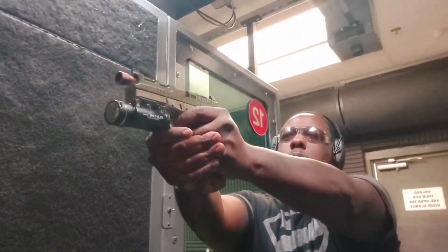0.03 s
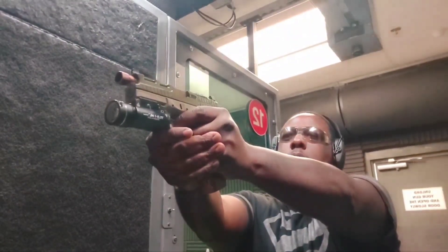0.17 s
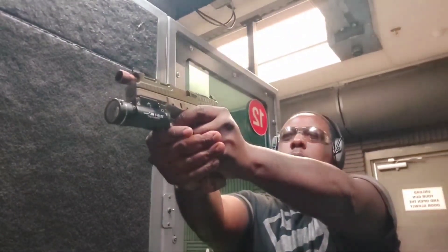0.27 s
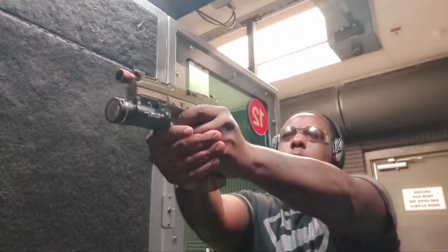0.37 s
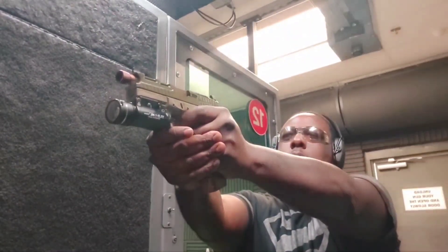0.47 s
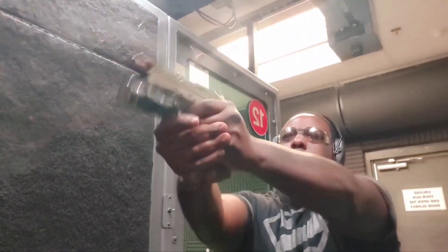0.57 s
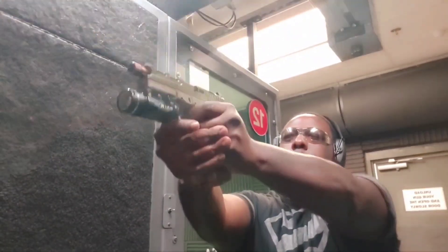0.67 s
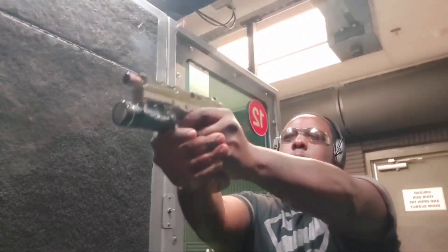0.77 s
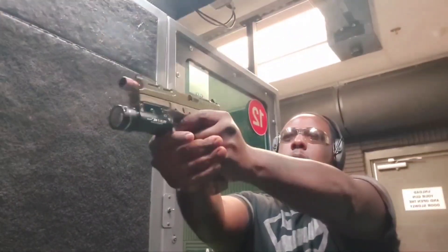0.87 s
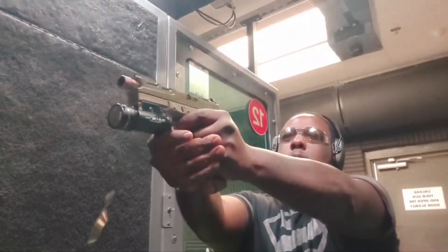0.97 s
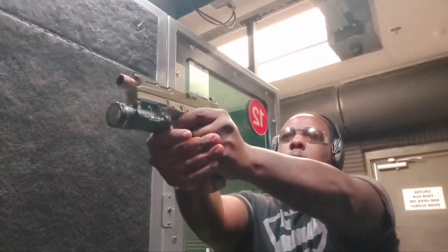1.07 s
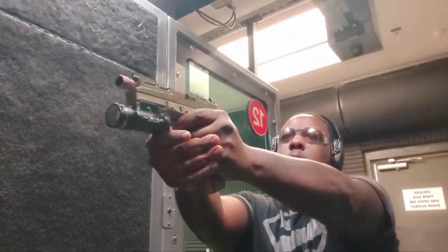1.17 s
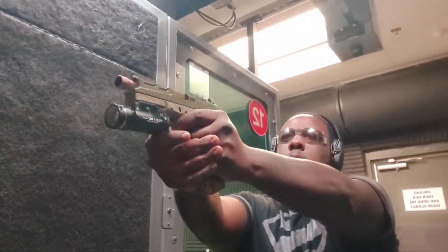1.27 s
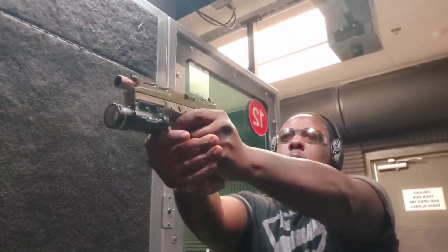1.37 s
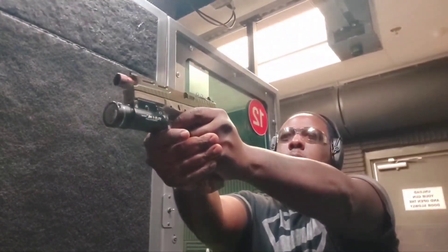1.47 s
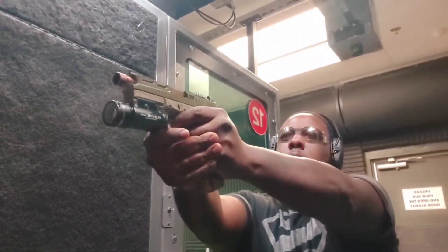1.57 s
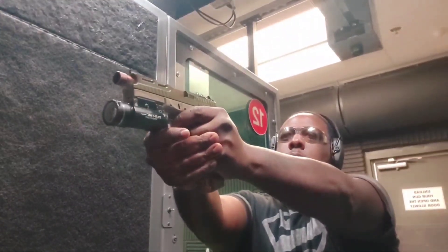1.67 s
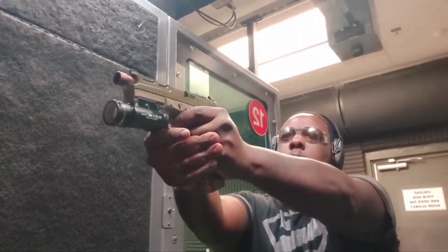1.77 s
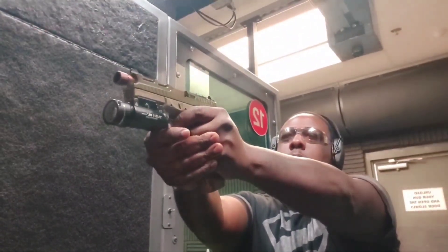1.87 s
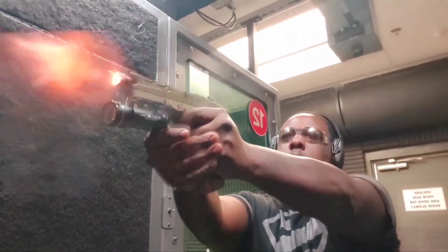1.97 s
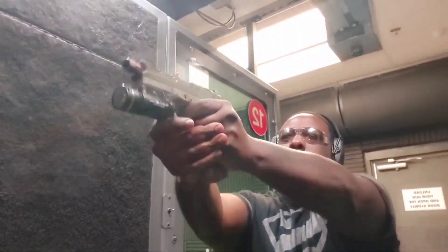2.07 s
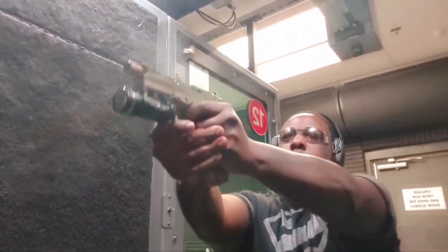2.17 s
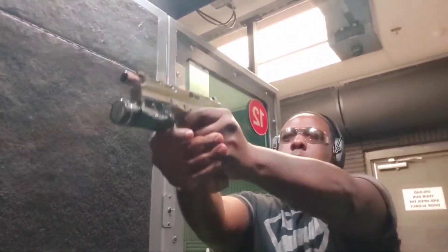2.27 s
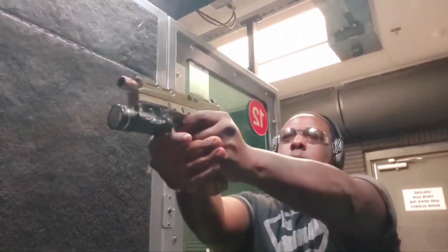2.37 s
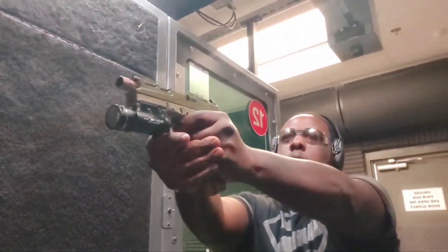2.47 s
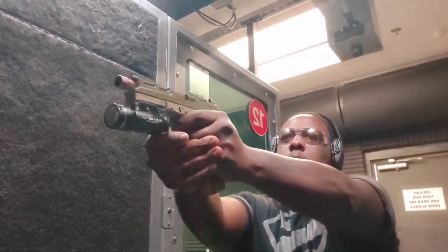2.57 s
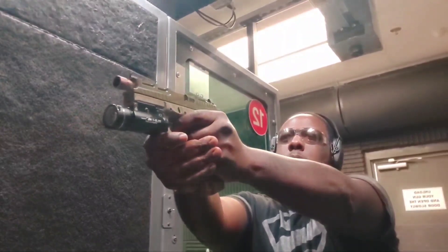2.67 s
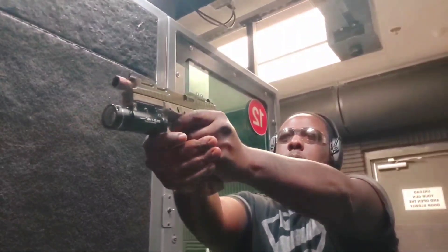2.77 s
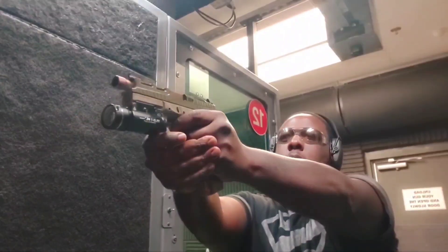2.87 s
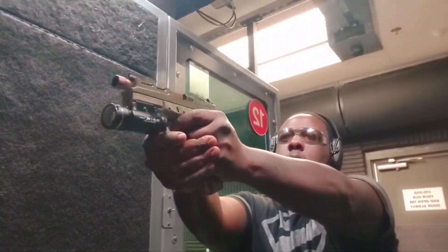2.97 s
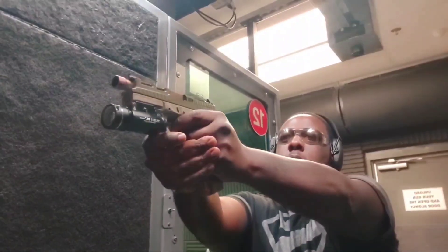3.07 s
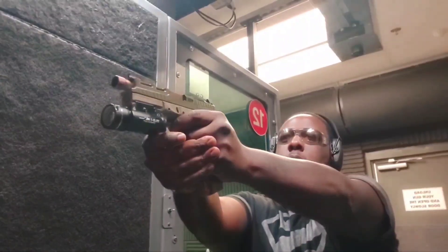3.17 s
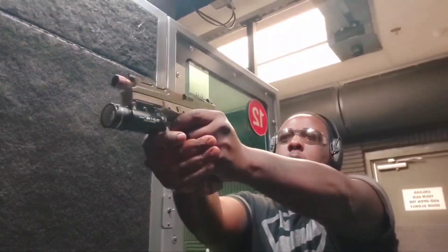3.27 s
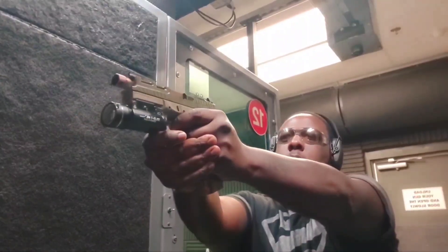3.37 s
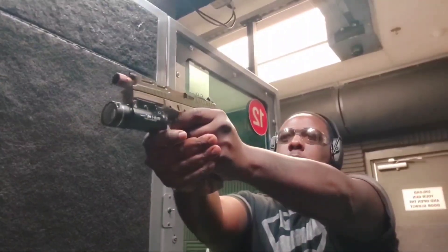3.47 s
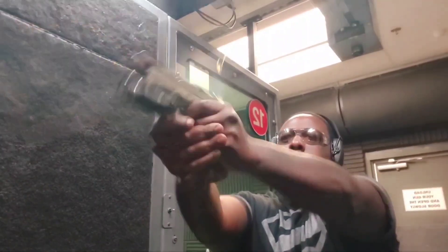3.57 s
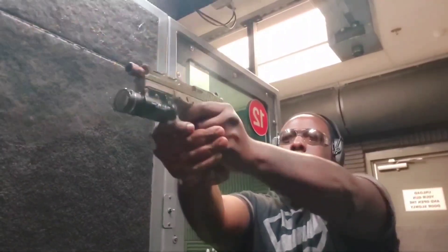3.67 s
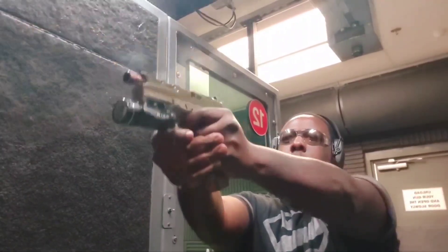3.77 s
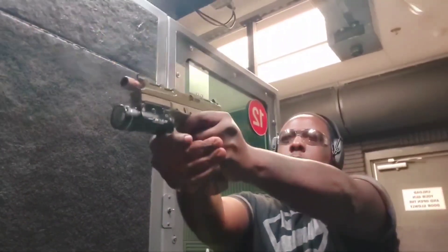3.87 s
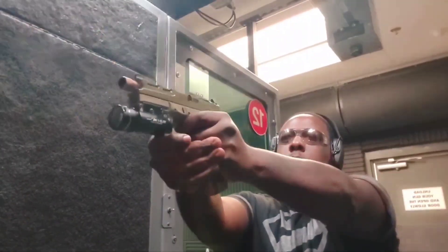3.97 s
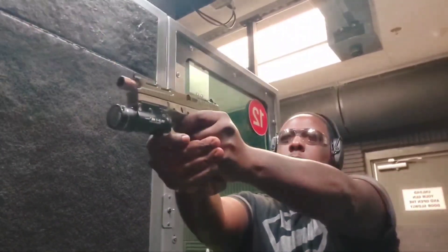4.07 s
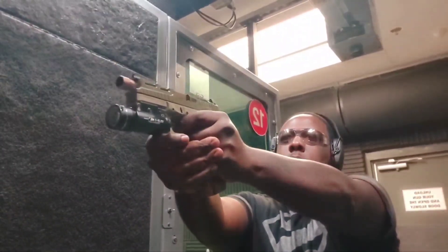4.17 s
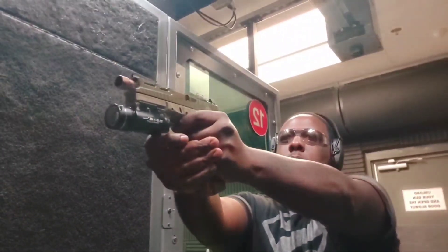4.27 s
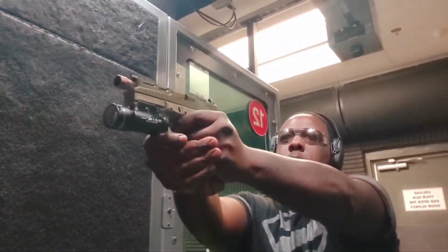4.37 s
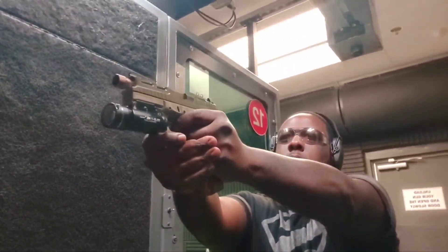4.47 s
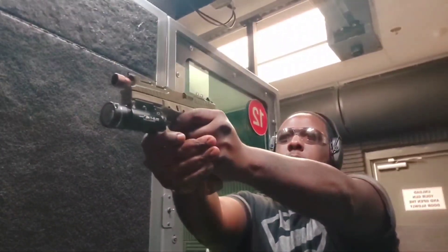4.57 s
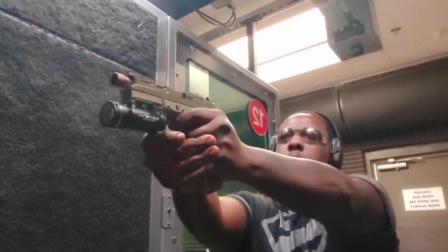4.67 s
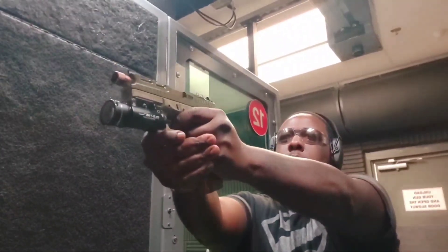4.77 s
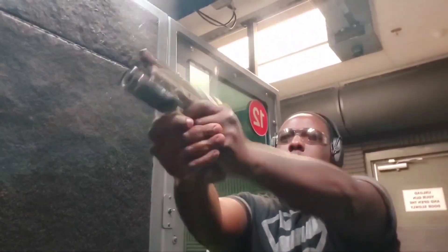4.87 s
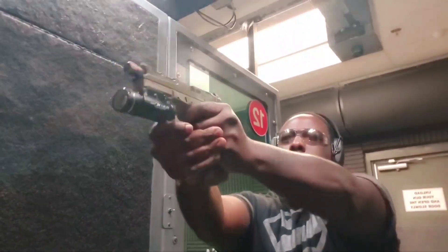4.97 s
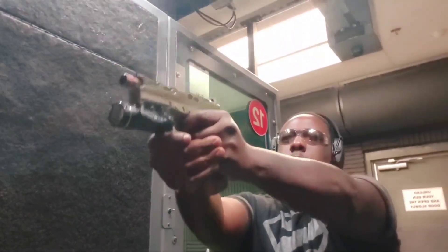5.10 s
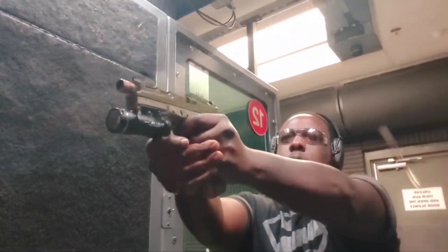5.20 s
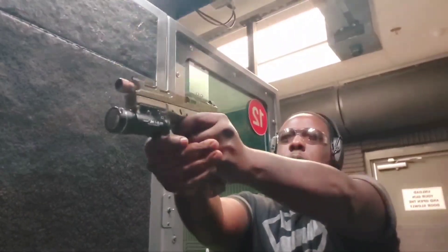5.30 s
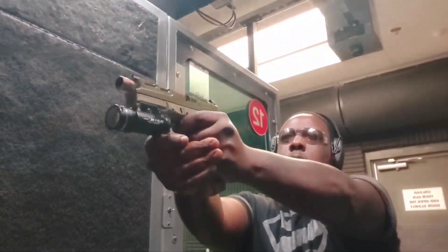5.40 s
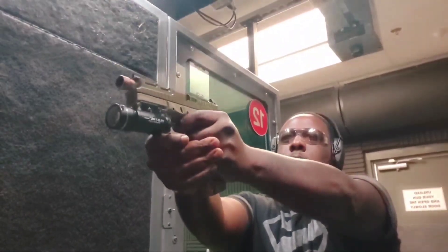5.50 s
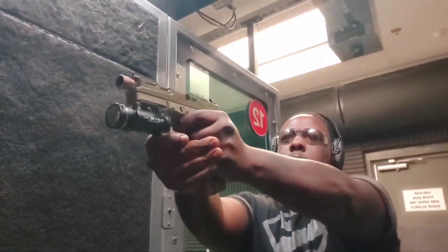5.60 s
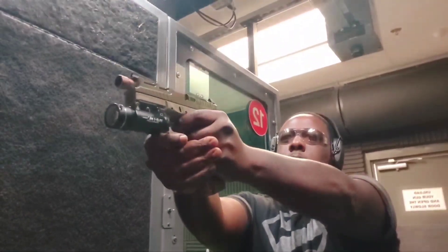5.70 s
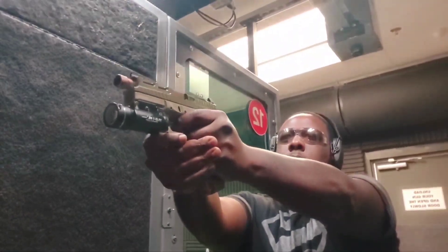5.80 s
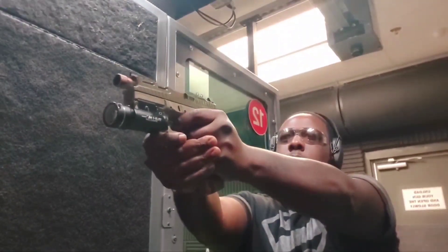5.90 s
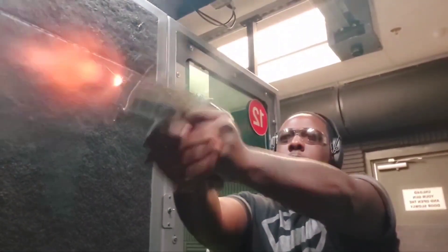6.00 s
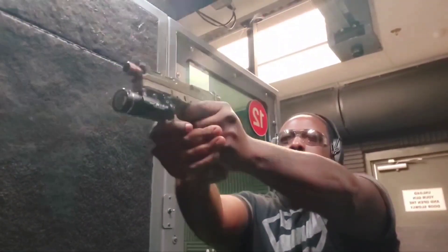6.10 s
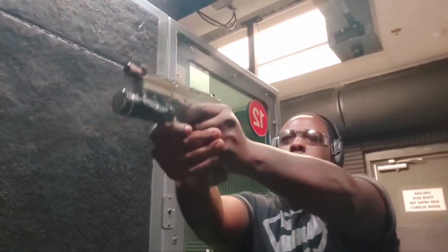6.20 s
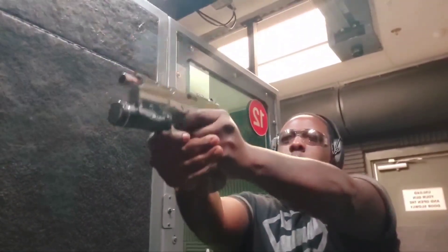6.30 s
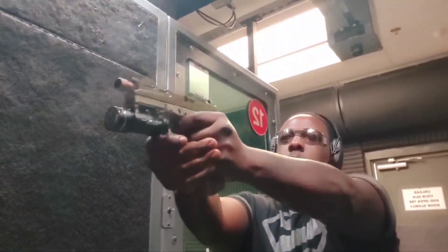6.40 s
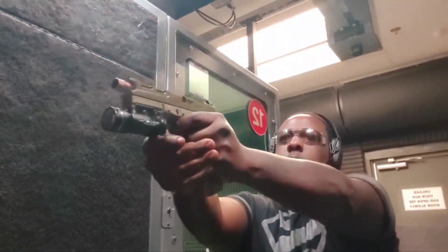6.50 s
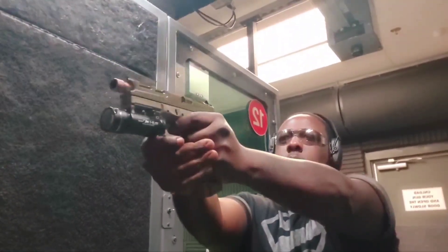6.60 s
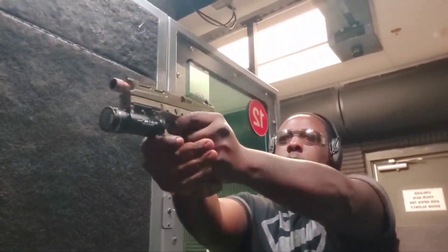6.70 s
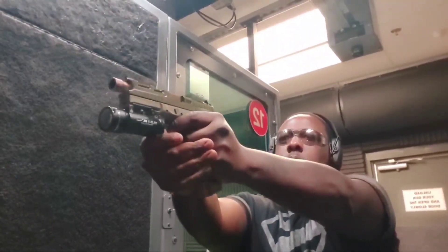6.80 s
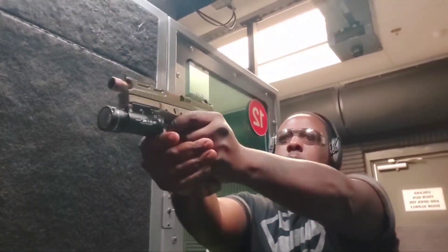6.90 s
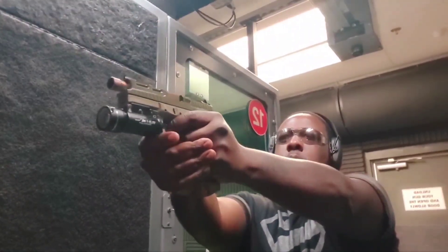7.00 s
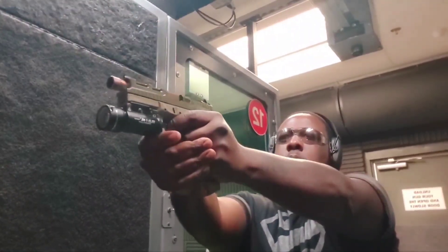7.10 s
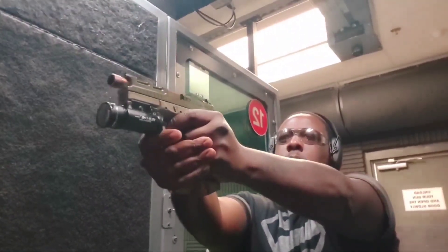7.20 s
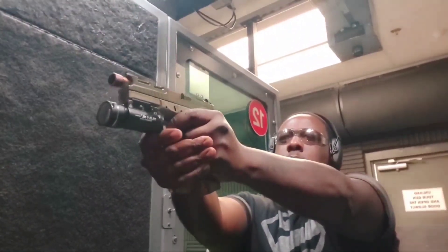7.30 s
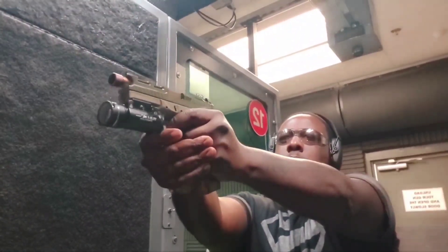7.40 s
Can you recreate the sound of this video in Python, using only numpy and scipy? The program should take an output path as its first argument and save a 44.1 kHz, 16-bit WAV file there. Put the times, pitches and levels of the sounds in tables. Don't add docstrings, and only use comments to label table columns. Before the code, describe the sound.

In a hard concrete indoor range, a handgun fires five single shots a little over a second apart. Each sharp crack slaps off the booth walls, rings briefly and blooms into echoes. Small brass cases tick and tinkle on the floor between blasts, over a low duct roar and fan drone. A close phone microphone clips and crackles.

```python
import sys
import numpy as np
from scipy import signal
from scipy.fft import rfft, irfft
from scipy.io import wavfile
from scipy.ndimage import uniform_filter1d

SR = 44100
rng = np.random.default_rng(int(sys.argv[2]) if len(sys.argv) > 2 else 0)


def voltage_ratio(level):
    return 10 ** (np.asarray(level, float) / 20)


def wrap_up_sound(samples):
    columns = np.atleast_2d(samples).T
    tamed = np.clip(columns, -1, 1)
    steps = np.round(tamed * 32767).astype(np.int16)
    wavfile.write(sys.argv[1], SR, steps)


N = 328545

# (time [s], blast level [dB])
SHOTS = [
    (0.6227, 2.5),
    (2.0943, 2),
    (3.6261, 2),
    (4.9425, 2.5),
    (6.1097, 2),
]
# (frequency [Hz], lead [rad])
LEFT_LEAD = [(50, 0.057), (130, 0.82), (250, 1.3), (450, 2.4), (900, 0.19), (2000, 0.23)]


def evened(x):
    return x / np.sqrt(np.mean(x ** 2) + 1e-20)


def read(points, hz, axis=1):
    table = np.transpose(points)
    return np.interp(np.log(hz + 1), np.log(table[0] + 1), table[axis])


def add(mix, s, sound):
    part = mix[..., round(s * SR):][..., :sound.shape[-1]]
    part += sound[..., :part.shape[-1]]


def colour(x, points):
    log_gain = np.log(voltage_ratio(read(points, abs(np.fft.fftfreq(8192, 1 / SR)))))
    taps = np.fft.ifft(np.exp(np.conj(signal.hilbert(log_gain)))).real[:4096]
    front_loaded = abs(taps[:64]).sum() > abs(taps[-64:]).sum()
    taps = taps if front_loaded else taps[::-1]
    return signal.oaconvolve(x, taps)[:len(x)]


def diffuse(points, size):
    # (frequency [Hz], likeness [0-1])
    likeness = [(60, 0.16), (130, 0.93), (290, 0.64), (640, 0.7), (1400, 0.04), (3000, 0.07), (8000, .02)]
    hz = np.fft.rfftfreq(size, 1 / SR)
    own, right = rfft(rng.standard_normal((2, size)))
    same = np.clip(read(likeness, hz), 0, 1)
    left = (same * right + np.sqrt(1 - same ** 2) * own) * np.exp(1j * read(LEFT_LEAD, hz))
    return hz, np.array([left, right]) * voltage_ratio(read(points, hz))


def resonate(x, hz, width_hz):
    turn = np.exp(2j * np.pi * hz * np.arange(len(x)) / SR)
    r = np.exp(-np.pi * width_hz / SR)
    return 2 * (turn * signal.lfilter([1 - r], [1, -r], x / turn)).real


def fan(hz):
    waver_hz = 2.2 * evened(uniform_filter1d(rng.standard_normal(N), size=SR // 8))
    phase = 2 * np.pi * np.cumsum(hz + waver_hz) / SR
    return np.sqrt(2) * np.sin(phase + [[read(LEFT_LEAD, hz)], [0]])


def ventilation():
    # (frequency [Hz], level [dB per Hz])
    duct = [(25, -103), (60, -86.5), (130, -90), (250, -89.5), (400, -83), (520, -86.5), (800, -92.5),
            (1200, -90.5), (2200, -101), (4000, -104), (6000, -108), (8600, -115), (10000, -127),
            (16000, -130)]
    # (frequency [Hz], level [dB])
    blades = [(129.2, -74.5), (285.3, -77), (389.5, -63.5), (430, -72), (456, -71), (1126, -76)]
    roar = irfft(diffuse(duct, N)[1], N)
    swell = evened(uniform_filter1d(uniform_filter1d(rng.standard_normal(N), 6000), 6000))
    roar *= voltage_ratio(-58 + 0.8 * swell) / roar[1].std()
    return roar + sum(voltage_ratio(db) * fan(hz) for hz, db in blades)


def bounce(bright_db, tick_db, body_db, ring_db):
    # (frequency [Hz], level [dB])
    knock_colour = [(1000, -27), (2500, -13), (4000, -8), (6500, -5.5), (8000, 4), (9500, -6.5), (11000, 2),
                    (14000, -1.5), (16500, -13.5)]
    t = np.arange(SR * 2 // 5) / SR
    knocks, thud, shimmer, grit = rng.standard_normal((4, len(t)))
    chatter = voltage_ratio(3.0 * evened(uniform_filter1d(grit, 130)))
    decay = voltage_ratio(-60 * t / 0.09) + voltage_ratio(-17.5 - 60 * t / 0.34)
    shape = (1 - np.exp(-t / 0.00069)) * decay * chatter
    bright = evened(colour(knocks, knock_colour)) * voltage_ratio(bright_db + 4.5) * shape
    tick = evened(np.diff(grit, prepend=0)) * voltage_ratio(tick_db + 6 - 60 * t / 0.005)
    body = voltage_ratio(body_db + 7.5) * evened(resonate(resonate(thud, 5330, 1100), 5330, 1100)) * shape
    mouth = np.sin(2 * np.pi * 10170 * t) + 0.34 * np.sin(2 * np.pi * 10215 * t)
    mouth += 0.44 * evened(resonate(resonate(shimmer, 10230, 90), 10230, 200))
    ring = voltage_ratio(ring_db - 0.5 - 60 * t / 0.32) * mouth
    return bright + tick + body + ring * (1 - np.exp(-t / 0.001))


def cases():
    # (time [s], bright scatter [dB], then against it: tick [dB],
    # body [dB], mouth ring [dB])
    landings = [(0.2415, -60, 9, -5.5, 1), (0.585, -68, -3, -10, -15), (0.989, -70, 13, -18, -3),
                (1.496, -56, -3, 4, 2), (1.9852, -56.5, 5, 4, -1.5), (2.394, -55, 14, 2, -20),
                (2.9877, -58, 9, -25, -4), (3.553, -55.5, -3, -8, 7.5), (4.118, -56, 21, -1, -20),
                (4.474, -60, 4, 2.5, 10.5), (4.7566, -70, -3, 3.5, 10), (5.406, -55.5, 21, -2, -17),
                (5.727, -51.5, 0, -0.5, -7.5), (6.479, -55.5, 18, 2, -15), (7.0256, -47.5, 3, -4, -15)]
    # (time [s], mouth ring [dB])
    tumbles = [(1.0934, -59), (1.199, -60), (2.493, -52.5), (2.5982, -57), (2.665, -60), (2.717, -60),
               (2.7994, -59), (3.136, -72), (4.06, -75), (4.15, -75), (5.3268, -53), (5.4634, -58.5),
               (5.6141, -64), (5.8704, -66.5), (6.42, -66), (6.5396, -66), (6.6264, -67), (6.6734, -65)]
    out = np.zeros((2, N))
    for s, db, tick_db, body_db, ring_db in landings:
        add(out, s, bounce(db, db + tick_db, db + body_db, db + ring_db))
    for s, db in tumbles:
        add(out, s, bounce(db - 17, db - 22, db - 15, db))
    return out


def lane():
    # (frequency [Hz], level [dB per Hz], first t60 [s], late tail [dB], late t60 [s])
    bands = [(40, -31.5, 0.74, -23.5, 1.6), (110, -10.5, 0.53, -22, 1.6), (176, -16, 0.59, -17.5, 1.39),
             (342, -7, 0.54, -23, 1.6), (435, 0.5, 0.6, -26.5, 0.64), (860, -4, 0.53, -23.5, 1.526),
             (1910, -8, 0.43, -24.5, 1.677), (2630, -15.5, 0.5, -29.5, 1.28),
             (3870, -18, 0.43, -19.5, 1.19), (5560, -20, 0.52, -30, 1.1), (9000, -19.5, 0.28, -22.5, 0.74),
             (12500, -17.5, 0.32, -34.5, .7), (16000, -45.5, .3, -27.5, .6)]
    # (frequency [Hz], level [dB], t60 [s])
    standing = [(51, -42.5, 1), (61.6, -42.5, 1.6), (71.4, -39, 1.6), (84.55, -41.5, 1.7),
                (105.7, -33.5, 1), (113.2, -28, 0.96), (129.3, -27, 0.75), (206.6, -33, 0.77),
                (245.4, -30.5, .9), (275.7, -35, 0.44), (398, -44, 1.82), (431, -16, 0.78), (465, -24, .6),
                (517, -25, 0.46), (570, -28, 0.22), (767, -27, 0.75), (884, -25, .5), (1026, -24.5, 0.6),
                (1160, -24.5, 0.59), (1200, -25.5, .5)]
    # (frequency [Hz], level [dB per Hz])
    spray_colour = [(500, -26.5), (1000, 4.5), (2000, -4.5), (3500, -1.5), (6000, -2), (9000, -13.5),
                    (16000, -12)]
    treble_build_s, bass_build_s, corner_hz, steepness = 0.0017, 0.13, 150, 2.7
    slap_s, slap_db, slap_t60 = 0.036, -6, 0.062
    size = 2 * SR
    t = np.arange(size) / SR
    hz, field = diffuse(bands, size)
    field /= np.sqrt(np.mean(irfft(field, size) ** 2))
    centres = np.log([row[0] for row in bands])
    out = np.zeros((2, size))
    for k, (f, _, t60, late_db, late_t60) in enumerate(bands):
        share = np.interp(np.log(hz + 1), centres, np.arange(len(bands)) == k)
        rise_s = treble_build_s + bass_build_s / (1 + (f / corner_hz) ** steepness)
        decay = voltage_ratio(-60 * t / t60) + voltage_ratio(late_db - 60 * t / late_t60)
        out += irfft(field * share, size) * (1 - np.exp(-t / rise_s)) * decay
    out *= voltage_ratio(-4)
    for f, db, t60 in standing:
        wave = np.sin(2 * np.pi * (f * t + rng.random()) + [[read(LEFT_LEAD, f)], [0]])
        out += voltage_ratio(db - 60 * t / t60) * (1 - np.exp(-t / 0.099)) * wave
    slap = (t > slap_s) * voltage_ratio(slap_db - 60 * abs(t - slap_s) / slap_t60)
    clumps_db = evened(uniform_filter1d(rng.standard_normal(size), 250))
    spray = evened(irfft(diffuse(spray_colour, size)[1], size)) * voltage_ratio(-2.5 + clumps_db)
    return out + spray * (voltage_ratio(-60 * t / 0.29) + slap)


def booth():
    # (frequency [Hz], level [dB], t60 [s])
    modes = [(407, -21.5, 0.067), (902, -4.5, 0.072), (1158, 2.5, 0.062), (1870, 0.5, 0.023),
             (2560, -9, 0.029)]
    # (time [s], level [dB])
    returns = [
        (0, -5.5),
        (.0032, 1.5),
        (.0075, -2),
        (0.009, -9),
        (.052, -11.5),
    ]
    t = np.arange(SR) / SR
    out = sum(voltage_ratio(db - 60 * t / t60) * np.cos(2 * np.pi * f * t) for f, db, t60 in modes)
    out *= 1 - np.exp(-t / 0.0006)
    out = signal.lfilter(*signal.butter(2, 260, "high", fs=SR), out)
    u = t[:400] / 0.000086
    blast_wave = (1 - u) * np.exp(-u)
    for s, db in returns:
        add(out, s, voltage_ratio(-14 + db) * blast_wave)
    return out


def shots():
    # (frequency [Hz], turn [rad])
    echo_drift = [(100, .15), (800, .3), (3000, .7)]
    out = np.zeros((2, N))
    usual, other, near = rfft(lane()), rfft(lane()), booth()
    drift = read(echo_drift, np.fft.rfftfreq(2 * SR, 1 / SR))
    aims = rng.permutation(np.linspace(-1, 1, len(SHOTS)))
    for (s, db), aim in zip(SHOTS, aims):
        room = irfft(np.cos(aim * drift) * usual + np.sin(aim * drift) * other)
        add(out, s, voltage_ratio(db) * room[:, :-SR // 4])
        add(out, s, voltage_ratio(db) * near)
    return out


def scene():
    return shots() + cases() + ventilation()


def overloaded(x):
    # (frequency [Hz], level [dB])
    port = [(30, 10), (120, 17), (230, 11.5), (420, -2), (900, -0.5), (1700, -1.5), (2700, -2.5),
            (4000, -9.5), (6000, -16), (16000, -18)]
    # (frequency [Hz], level [dB])
    cavity = [(3000, 0), (6000, -2), (8000, -13), (9200, -18), (10300, -3), (12500, 8), (14000, -1.5),
              (15600, 1.5)]
    left = colour(np.roll(x, 24), port)
    power_db = 10 * np.log10(signal.lfilter([0.003], [1, -0.997], left ** 2) + 1e-12)
    left = left / voltage_ratio(0.73 * np.maximum(power_db + 9, 0))
    clipped = left / (1 + abs(left / voltage_ratio(-3.1)) ** 4) ** (1 / 4)
    fizz = voltage_ratio(-12.0) * np.tanh(abs(left - clipped)) * rng.standard_normal(N)
    hiss = voltage_ratio(-100) * rng.standard_normal(N)
    return colour(clipped + fizz, cavity) + hiss


def stunned(x):
    # (frequency [Hz], level at full loss [dB])
    stun_loss = [(50, -30), (200, -30), (400, -30), (900, -44), (1800, -36), (4000, -32), (12000, -30)]
    # (frequency [Hz], level [dB], change at full loss [dB])
    membrane = [(200, -28.5, -6), (453, -3, 5), (1000, -9, -3.5), (2000, -5, -4.5), (2700, 1, 2.5),
                (3850, 4, 6), (5330, 1.5, 5), (5630, -14, -11), (7500, -3, -9.5), (9800, -20.5, -6),
                (12000, -4.5, 4), (14500, -7, -1.5), (15600, -3.5, 2.5)]
    recover_s, recover_shape = 0.067, 1.44
    rattle_db, rattle_rise_s, sag_db_per_s2 = -26.5, 0.028, 440
    window, hop = 512, 128
    last_blast = np.array([-1] + [s - 0.002 for s, _ in SHOTS])
    since = np.arange(N) / SR
    since -= last_blast[np.searchsorted(last_blast, since, "right") - 1]
    noise = evened(colour(rng.standard_normal(N), membrane))
    z = signal.stft([x, noise], nperseg=window, noverlap=window - hop)[2]
    ahead = np.minimum(np.arange(z.shape[2]) * hop + 2 * hop, N - 1)
    lost = np.exp(-(since[ahead] / recover_s) ** recover_shape)
    hz = np.fft.rfftfreq(window, 1 / SR)
    full_loss_db = np.array([read(stun_loss, hz), read(membrane, hz, axis=2)])
    z *= voltage_ratio(full_loss_db[..., None] * lost)
    dulled, rattle = signal.istft(z, nperseg=window, noverlap=window - hop)[1][:, :N]
    swell = 1 - np.exp(-(since / rattle_rise_s) ** 2)
    return dulled + rattle * voltage_ratio(rattle_db - sag_db_per_s2 * since ** 2) * swell


def top_cut(x):
    return signal.sosfilt(signal.butter(12, 17010, fs=SR, output="sos"), x)


def record(dry):
    both = np.array([overloaded(dry[0]), stunned(dry[1])])
    edge = signal.firwin(301, 16000, window=("kaiser", 5.0), fs=SR)
    return top_cut(signal.oaconvolve(both, edge[None], "same"))


dry = scene()
out = record(dry)
wrap_up_sound(out)
```